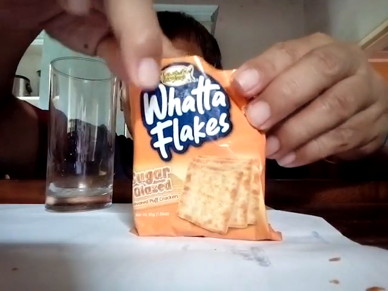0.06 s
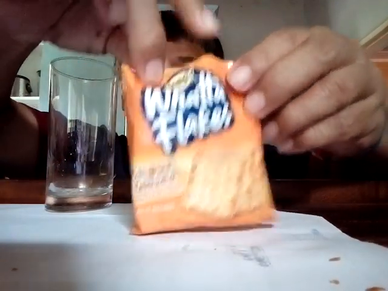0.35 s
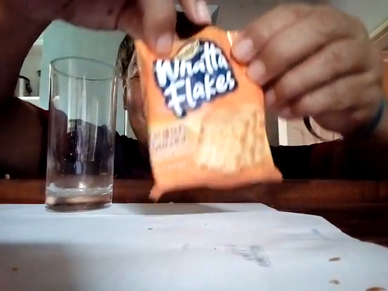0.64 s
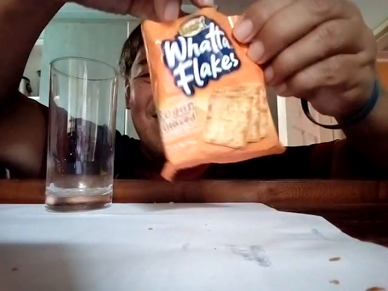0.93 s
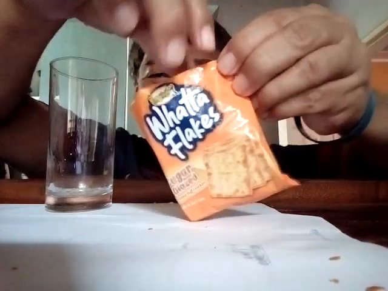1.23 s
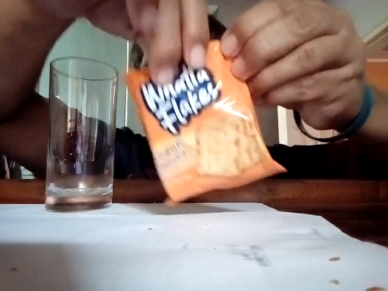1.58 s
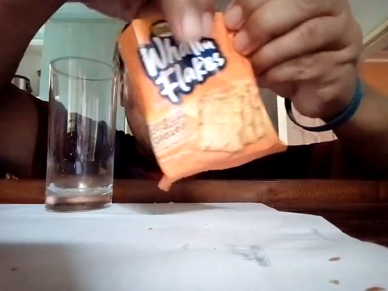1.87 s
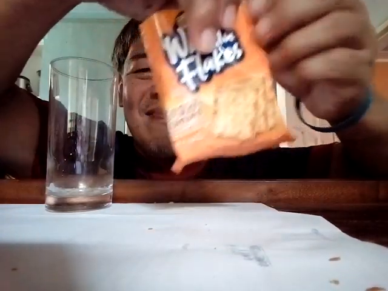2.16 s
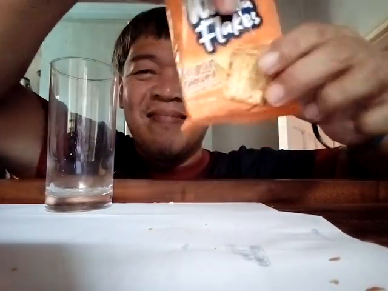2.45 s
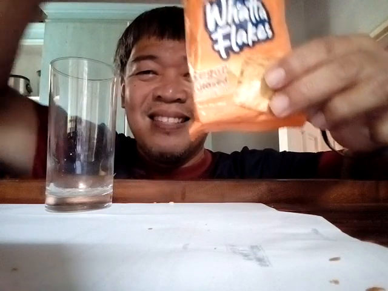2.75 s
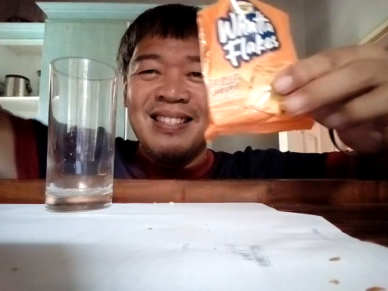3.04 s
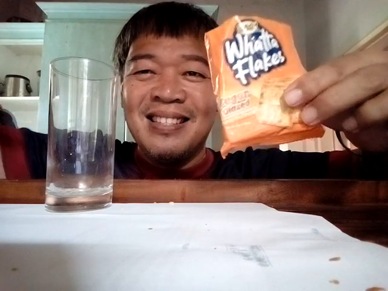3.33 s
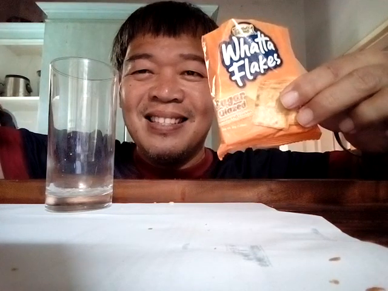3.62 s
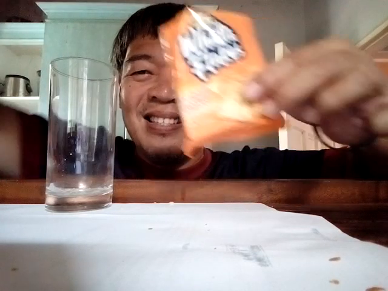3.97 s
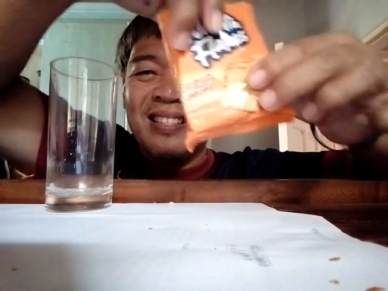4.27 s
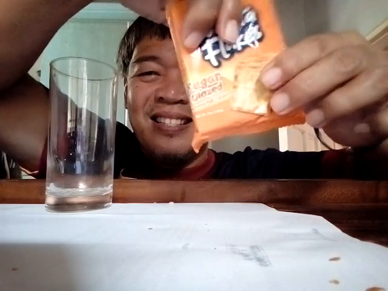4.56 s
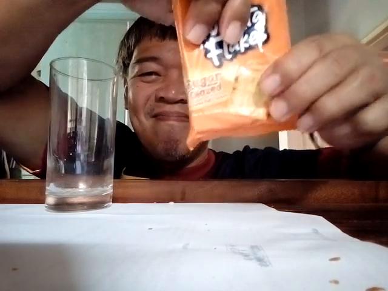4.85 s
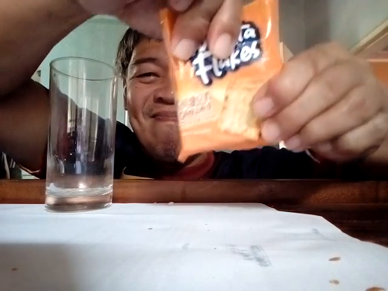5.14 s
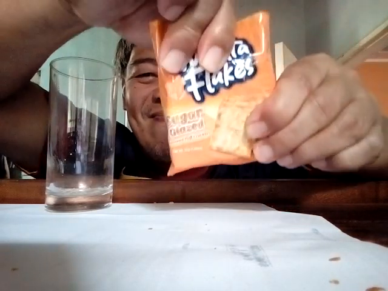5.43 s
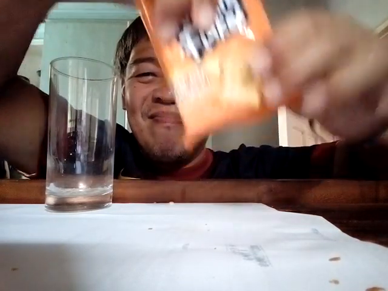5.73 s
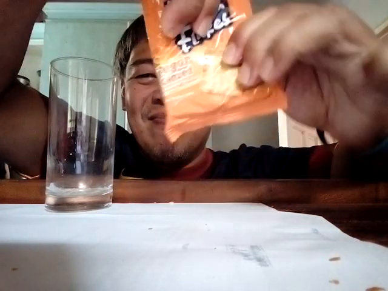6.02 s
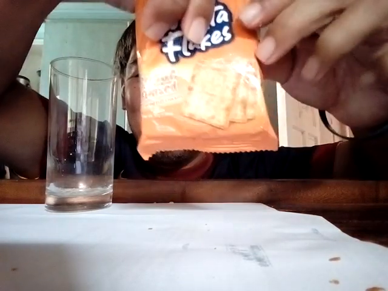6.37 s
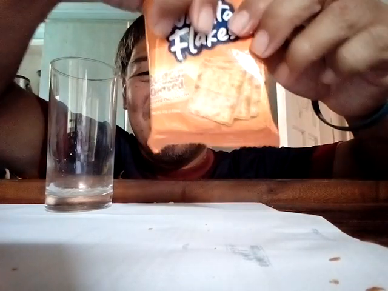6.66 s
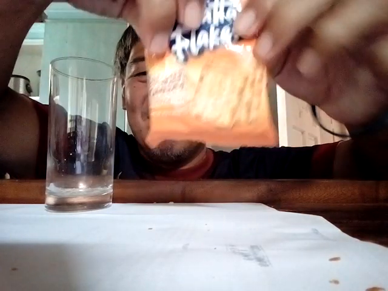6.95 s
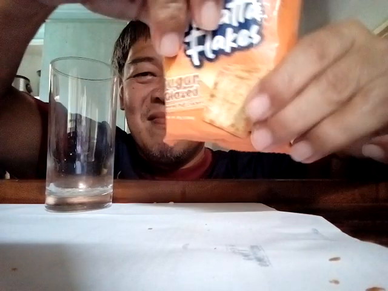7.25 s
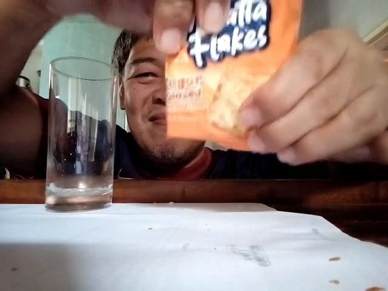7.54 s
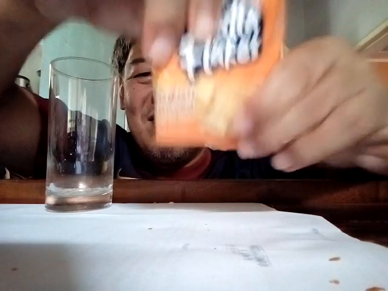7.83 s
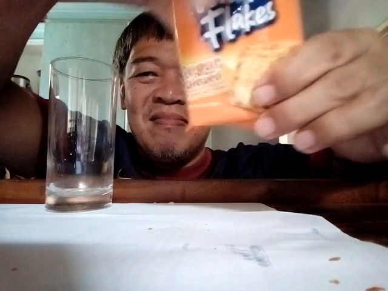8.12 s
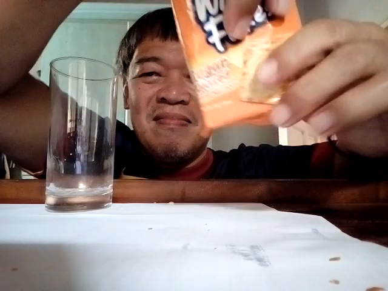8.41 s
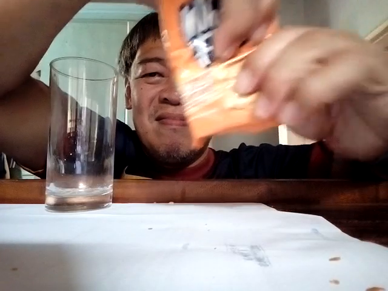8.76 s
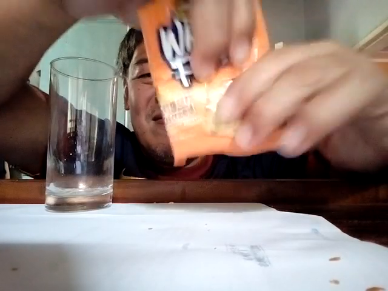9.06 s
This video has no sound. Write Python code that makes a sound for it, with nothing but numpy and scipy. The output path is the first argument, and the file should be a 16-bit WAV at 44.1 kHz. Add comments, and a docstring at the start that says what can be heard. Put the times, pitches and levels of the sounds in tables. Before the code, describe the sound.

From the start, hands pick up and finger a sealed plastic packet of crackers close to a small microphone. The wrapper gives scattered hollow pops, sharp ticks and light crinkles, with a few soft, dull bumps against table and fingers in the first two and a half seconds. The pops thin out around 3 seconds, and from about 3.4 to 4.2 seconds only a faint room rumble and hiss remain. Then the handling resumes, and from 4.6 seconds hard squeezes crack and crumble the crackers under dense crinkling, loud snaps and a bright fizz of sliding fingers and crumbs. The crushing comes in uneven bursts, eases between about 6.3 and 7.2 seconds, then is strong again until 8. After a brief lull, another loud squeeze runs from about 8.6 seconds to the end, just past 9. The small room adds a short tail.

```python
"""Plastic film pops now and then over a faint room rumble, as two hands pick up and finger a sealed
packet of crackers close to a small microphone in a small room. After a pause they squeeze it hard, and
the crackers crack and crumble under dense crinkling. Panels of the wrapper flip with a hollow pop,
creases run with a sharp tick, sliding fingers and crumbs fizz, and the packet bumps dully against
table and fingers. The near walls answer with a short tail."""
import sys
import numpy as np
from scipy import signal
from scipy.fft import rfft, irfft
from scipy.io import wavfile

SR = 44100
rng = np.random.default_rng(int(sys.argv[2]) if len(sys.argv) > 2 else 0)


def file_out(sig):
    """Save sig as 16-bit WAV at sys.argv[1]."""
    # one column per channel
    cols = np.atleast_2d(sig).T
    # limit, then scale
    lim = np.clip(cols, -1, 1)
    pcm = np.round(lim * 32767).astype(np.int16)
    wavfile.write(sys.argv[1], SR, pcm)


N = 400869

# spectrum of the room tone and microphone hiss: (frequency [Hz], relative level [dB])
ROOM_TONE = [(20, -19), (65, -4.5), (135, 2), (220, -7.5), (500, -12.5), (3500, -23), (6700, -25.5),
             (8500, -39.5), (13700, -40), (14700, -28)]
# finger presses: (start [s], length [s], crackle level half-way [dB], swell from start to end [dB])
PRESSES = [(0.005, 0.019, -45.5, -8), (0.084, .13, -45, -4), (0.329, 0.15, -50, -9), (0.52, 0.051, -53, 8),
           (0.695, 0.15, -67, -5), (1.124, .16, -46, 1.5), (1.498, .22, -55, 1), (2.169, 0.1, -58, 17),
           (2.444, 0.22, -58, 1), (4.174, 0.059, -53.5, 9.5), (4.616, 0.061, -37, -5),
           (4.754, 0.051, -42, 1), (4.871, 0.14, -37, 3), (5.049, 0.079, -33, 9), (5.257, 0.21, -36, 4),
           (5.609, .17, -44, 1), (5.839, 0.24, -35, 7), (6.19, 0.1, -42, 10), (6.401, 0.14, -57, -4),
           (6.649, 0.0594, -49, -2), (6.765, 0.086, -43, -6), (6.988, 0.13, -47, 6),
           (7.252, 0.24, -39, 14.5), (7.573, .25, -32, -2), (7.942, .025, -37, 3), (8.083, 0.11, -37.5, 1),
           (8.44, 0.19, -42, -4), (8.665, 0.22, -33, 5.5), (8.921, .17, -36, -8)]
# modes of a panel of the wrapper: (frequency [multiple of the pop pitch], level [dB])
PANEL_MODES = [(.45, -11), (0.781, -4.5), (1.051, -2), (1.38, -8.5)]
# how taut the film is; taut film ticks, slack film pops: (time [s], tick level over pop [dB])
TAUTNESS = [(.5, -1), (1.2, 6), (2.4, -5.5), (4.8, 4), (6.1, 5.5), (6.3, 0.5), (7.3, -2.5), (7.85, 14),
            (7.95, -3), (9.05, 8.5)]
# snaps that stand out of the crackle: (time [s], pop level [dB], pop pitch [Hz], tick level [dB])
SNAPS = [(0.0125, -35, 1460, -42.5), (0.114, -49, 900, -37), (0.1462, -39.5, 1840, -48),
         (0.1816, -38.5, 759, -39), (0.2198, -34, 1580, -33), (0.342, -33.5, 1260, -41),
         (0.3638, -32.5, 1610, -39), (0.434, -55, 2230, -42), (0.5159, -45, 1690, -51),
         (0.6958, -46.5, 1450, -49.5), (0.7862, -45.5, 1370, -45), (0.8292, -43, 1230, -48),
         (0.9732, -35, 1200, -42), (0.9826, -40, 1220, -50), (1.067, -44, 1131, -43),
         (1.0987, -37, 1150, -39), (1.124, -33.5, 1380, -32.5), (1.1651, -38, 1423, -37.5),
         (1.195, -37, 1250, -55), (1.2324, -31.5, 1466, -41), (1.351, -66, 2180, -45.5),
         (1.523, -40.5, 963, -63), (1.5828, -36, 1190, -38.5), (1.7001, -37.5, 1588, -43.5),
         (1.725, -37.5, 1080, -34), (1.8196, -48, 1520, -34), (1.8278, -36.5, 1300, -58),
         (1.863, -46, 1400, -39.5), (1.88, -28, 1115, -34), (2.0803, -56, 1340, -49.5),
         (2.1395, -45.5, 1617, -45.5), (2.1743, -40, 1623, -47), (2.2783, -33.5, 1031, -36),
         (2.4178, -54, 884, -53), (2.5198, -39.5, 1024, -50), (2.5587, -39.5, 1036, -44),
         (2.5734, -38, 1380, -42), (2.588, -40, 1610, -43.5), (2.6477, -43, 960, -69),
         (2.9023, -42, 1780, -37.5), (3.023, -53, 1470, -60), (3.077, -54, 1540, -48.5),
         (3.1201, -40.5, 1270, -42.5), (3.358, -52, 1540, -51.5), (4.2271, -36.5, 2042, -38),
         (4.3515, -40, 1727, -40.5), (4.3653, -39, 1416, -44), (4.418, -49, 1930, -47),
         (4.5483, -41, 1916, -41), (4.6264, -24, 1694, -22), (4.6724, -32, 1657, -29.5),
         (4.7936, -32, 2173, -30), (4.8684, -36.5, 1506, -27), (4.9307, -27.5, 1512, -32.5),
         (4.9611, -26.5, 1426, -23), (5.107, -19.5, 1390, -39), (5.128, -29.5, 1622, -28),
         (5.2031, -28.5, 2733, -52), (5.2553, -31.5, 1532, -35), (5.3535, -25.5, 1128, -27),
         (5.4132, -26, 2045, -30.5), (5.637, -36, 1202, -40), (5.8496, -32.5, 2296, -33.5),
         (6.011, -33.5, 1705, -27), (6.0327, -27, 1525, -22), (6.0725, -52, 1963, -26.5),
         (6.1482, -61, 2000, -27), (6.19, -37, 1560, -42), (6.414, -53, 2623, -39),
         (6.4616, -43.5, 1263, -46.5), (6.5287, -34.5, 1460, -30), (6.9827, -41, 1383, -54),
         (7.0926, -34.5, 1499, -42), (7.2578, -38.5, 1112, -33.5), (7.4015, -25.5, 1920, -27.5),
         (7.4862, -35, 1429, -23), (7.5634, -25, 2530, -37), (7.5979, -23, 1465, -36),
         (7.64, -21.5, 1150, -28.5), (7.6597, -34, 1675, -24.5), (7.7, -24, 2050, -27),
         (7.7544, -27, 776.7, -31.5), (7.7803, -27.5, 1340, -27), (7.9413, -31, 859.5, -32),
         (7.9632, -28.5, 1804, -33), (8.2877, -52, 1930, -38), (8.3202, -41, 1056, -48),
         (8.443, -36.5, 1290, -41), (8.512, -59, 1710, -32), (8.636, -29.5, 2582, -37),
         (8.8191, -23, 1638, -41), (8.8768, -25, 1732, -22.5), (8.973, -28, 1840, -27.5)]
# bumps of the packet against table and fingers: (time [s], level [dB], pitch [Hz])
BUMPS = [(0.092, -31, 343), (0.114, -38, 122), (0.183, -39, 240), (0.218, -35, 210), (1.1, -37.5, 218.3),
         (1.881, -34, 330), (2.264, -42.5, 281.3), (2.519, -41.5, 382.6), (6.826, -36.5, 210.7)]
# the small microphone, with a presence peak and little top octave: (frequency [Hz], gain [dB])
MIC_RESPONSE = [(400, 1), (3100, 0), (5000, -1), (6700, 0.5), (7500, -3.5), (8500, -7.5), (12000, -20)]


def gain_of(db):
    """Decibels to amplitude."""
    return 10 ** (np.asarray(db) / 20)


def unit_rms(x):
    """Scales to rms 1."""
    return x / np.sqrt(np.mean(x ** 2))


def gain_at(spectrum, hz):
    """Amplitude of a spectrum table, read on a log-frequency axis."""
    table_hz, db = np.transpose(spectrum)
    return gain_of(np.interp(np.log(hz + 1), np.log(table_hz), db))


def add(mix, s, sound):
    """Mixes a sound in at s seconds."""
    part = mix[max(round(s * SR), 0):][:len(sound)]
    part += sound[:len(part)]


def smoothed(x, s):
    """Running mean under a soft window s seconds long."""
    window = signal.windows.hann(round(s * SR))
    return signal.oaconvolve(x, window / window.sum(), "same")


def room_tone(db=-61):
    """Low rumble of the room and the microphone's own hiss, steady throughout."""
    spectrum = rfft(rng.standard_normal(N)) * gain_at(ROOM_TONE, np.fft.rfftfreq(N, 1 / SR))
    return gain_of(db) * unit_rms(irfft(spectrum, N))


def squeeze(hold_db=-75, grip_db_per_s=302, relax_db_per_s=260):
    """Amplitude of the fine crackle: each press grips quickly, swells or eases, then lets go."""
    t, power = np.arange(N) / SR, np.full(N, gain_of(hold_db) ** 2)
    for start, length, db, swell_db in PRESSES:
        near = abs(t - start - length / 2) < length / 2 + .25
        age = t[near] - start
        swell = swell_db * (np.clip(age / length, 0, 1) - .5)
        fade = grip_db_per_s * np.maximum(-age, 0) + relax_db_per_s * np.maximum(age - length, 0)
        power[near] += gain_of(db + swell - fade) ** 2
    return np.sqrt(power)


def rustle(effort, gain_db=-14, slips_per_s=1500, low_hz=2200, follow=0.73, light_touch_db=-63):
    """Fingers and crumbs slide on the film: tiny slips blend into a bright fizz."""
    slips = rng.standard_normal(N) * (rng.random(N) < slips_per_s / SR)
    fizz = unit_rms(signal.lfilter(*signal.butter(1, low_hz, "highpass", fs=SR), slips))
    # under a light touch the fingers mostly slide, so the fizz takes a larger share
    grip = np.maximum(effort, gain_of(light_touch_db)) / effort.max()
    return gain_of(gain_db) * effort * grip ** (follow - 1) * fizz


def film_ring(mode_hz, mode_db, decay_cycles, scatter_s, rise_cycles=0.18):
    """Heavily damped modes of the film, set off a moment apart; their energy is that of 4 ms at rms 1."""
    t, hz = np.arange(900) / SR, mode_hz[:, None]
    delay = scatter_s * rng.exponential(1, hz.shape)
    age = np.maximum(t - delay + delay.min(), 0)
    # small, high patches of film start and die faster than large, low ones
    cycles = age * hz.mean()
    envelope = np.exp(-cycles / decay_cycles) * (1 - np.exp(-cycles / rise_cycles))
    modes = np.sqrt(hz) * np.sin(2 * np.pi * hz * age) * envelope
    wave = (rng.choice([-1, 1], len(hz)) * gain_of(mode_db)) @ modes
    return wave / np.sqrt(np.sum(wave ** 2) / (.004 * SR))


def pop(hz):
    """A whole panel of the wrapper flips with a hollow pop, in a slightly new shape each time."""
    multiple, db = np.transpose(PANEL_MODES)
    mode_hz = hz * multiple * rng.lognormal(0, 0.0916, len(db))
    return film_ring(mode_hz, db, decay_cycles=1.89, scatter_s=0.0003455)


def tick(low_hz=2600, high_hz=7300, jumps=12):
    """A crease runs through the film in tiny jumps, heard as one sharp tick."""
    mode_hz = rng.uniform(low_hz, high_hz, jumps)
    return film_ring(mode_hz, np.zeros(jumps), decay_cycles=2.58, scatter_s=0.000657)


def crackle(effort, rest_per_s=55, squeeze_per_s=1000, size_db=4.5, clump_db=2.5, pop_hz=1680):
    """Small creases and breaking crumbs: harder squeezing makes them louder and more frequent."""
    per_s = rest_per_s + squeeze_per_s * np.sqrt(effort / effort.max())
    breaks = rng.random(N) < per_s / SR
    strength = breaks * gain_of(size_db * np.minimum(rng.exponential(1, N), 3.6))
    # the grains of any short moment share the work that the fingers put in
    strength *= effort / np.sqrt(np.maximum(smoothed(strength ** 2, s=0.052), rest_per_s / SR))
    # one break sets off its neighbours, so the grains come in clumps
    strength *= gain_of(clump_db * unit_rms(smoothed(rng.standard_normal(N), s=0.041)))
    out = np.zeros(N)
    for at in np.flatnonzero(strength):
        pitch_spread, tick_spread = np.clip(rng.standard_normal(2), -2, 2)
        tick_db = np.interp(at / SR, *np.transpose(TAUTNESS)) + 5 * tick_spread
        grain = pop(pop_hz * np.exp(0.471 * pitch_spread)) + gain_of(tick_db) * tick()
        add(out, at / SR, strength[at] * grain / np.linalg.norm(grain))
    return out


def radiated(x, cutoff_hz):
    """A small surface gives off little bass into the air."""
    return signal.sosfilt(signal.butter(2, cutoff_hz, "highpass", fs=SR, output="sos"), x)


def snaps(tear_db=-13, tear_s=0.00099, creak_db=-15, creak_s=0.0037, creaks=4):
    """Single loud snaps: pop and tick together, a dry tear on top, small creaks as the film settles."""
    out, t = np.zeros(N), np.arange(SR // 100) / SR
    for s, pop_db, hz, tick_db in SNAPS:
        hollow = radiated(pop(hz), cutoff_hz=0.35 * hz)
        add(out, s, gain_of(pop_db) * hollow + gain_of(tick_db) * tick())
        tear = unit_rms(rng.standard_normal(len(t)) * np.exp(-t / tear_s))
        add(out, s, gain_of(tick_db + tear_db) * tear)
        for delay, octaves in zip(rng.exponential(creak_s, creaks), rng.uniform(-0.993, 1, creaks)):
            creak = gain_of(pop_db) * pop(hz * 2 ** octaves) + gain_of(tick_db) * tick()
            add(out, s + delay, gain_of(creak_db) * creak)
    return out


def bumps(decay_cycles=0.86):
    """The packet meets table and fingers: soft low thuds that die within a few cycles."""
    t, out = np.arange(SR // 10) / SR, np.zeros(N)
    for s, db, hz in BUMPS:
        add(out, s, gain_of(db) * np.sin(2 * np.pi * hz * t) * np.exp(-t * hz / decay_cycles))
    return out


def reflections(x, early_db=-17, tail_db=-12.5, t60_s=0.3, wall_s=0.0072, wall_spread_s=0.014):
    """The near walls and a short room tail; the packet moves, so their pattern keeps changing."""
    t, hop, out = np.arange(SR // 2) / SR, SR // 20, np.zeros(N)
    early = (t > wall_s) * np.exp(-abs(t - wall_s) / wall_spread_s)
    early *= gain_of(early_db) / np.linalg.norm(early)
    tail = (t > wall_s / 2) * gain_of(-60 * t / t60_s)
    tail *= gain_of(tail_db) / np.linalg.norm(tail)
    envelope = np.hypot(early, tail)
    for at in range(0, N - hop, hop):
        piece = x[at:at + 2 * hop]
        response = envelope * rng.choice([-1, 1], len(t))
        add(out, at / SR, signal.fftconvolve(piece * signal.windows.cosine(len(piece)), response))
    return out


def microphone(x):
    """The small microphone colours what reaches it, as a minimum-phase filter."""
    log_gain = np.log(gain_at(MIC_RESPONSE, abs(np.fft.fftfreq(4096, 1 / SR))))
    taps = np.fft.ifft(np.exp(np.conj(signal.hilbert(log_gain)))).real
    return signal.oaconvolve(x, taps[:len(taps) // 2])[:N]


def scene():
    """One microphone close to the packet, with the small room well behind the direct sound."""
    background, effort = room_tone(), squeeze()
    crinkling = rustle(effort) + snaps() + crackle(effort)
    packet = radiated(crinkling, cutoff_hz=235) + bumps()
    return (microphone(packet + reflections(packet)) + background)[None]


def record(dry):
    """The recorder cuts off the highest treble."""
    lowpass = signal.firwin(511, cutoff=15900, window="blackman", fs=SR)
    return signal.oaconvolve(dry, lowpass[None], "same")


dry = scene()
out = record(dry)
file_out(out)
```